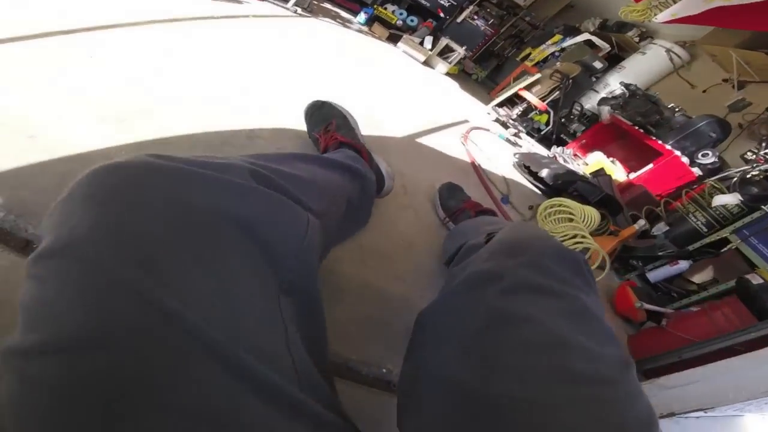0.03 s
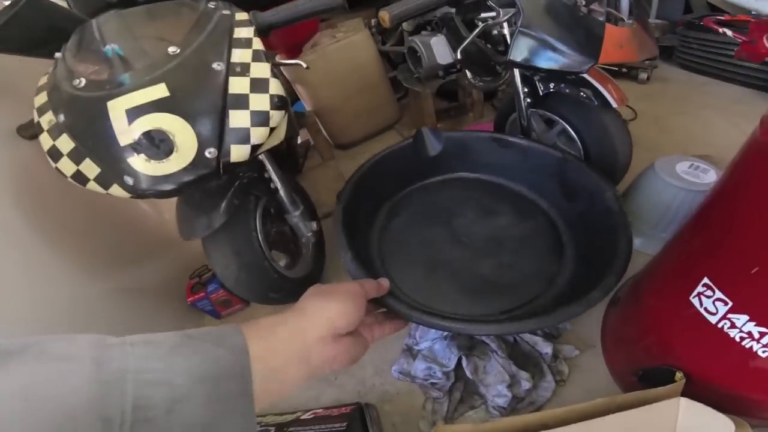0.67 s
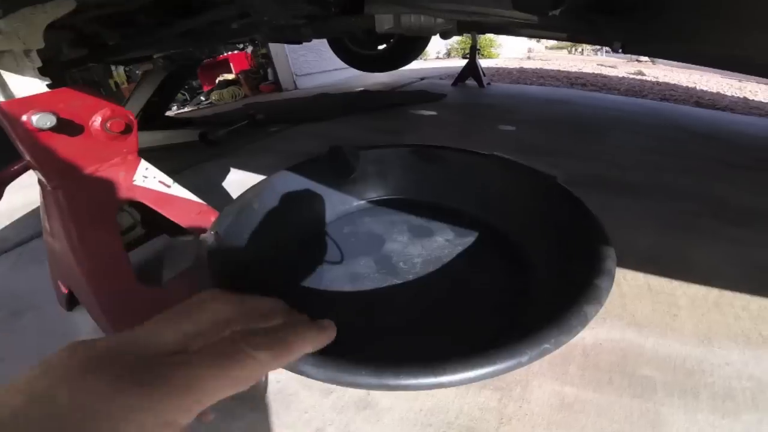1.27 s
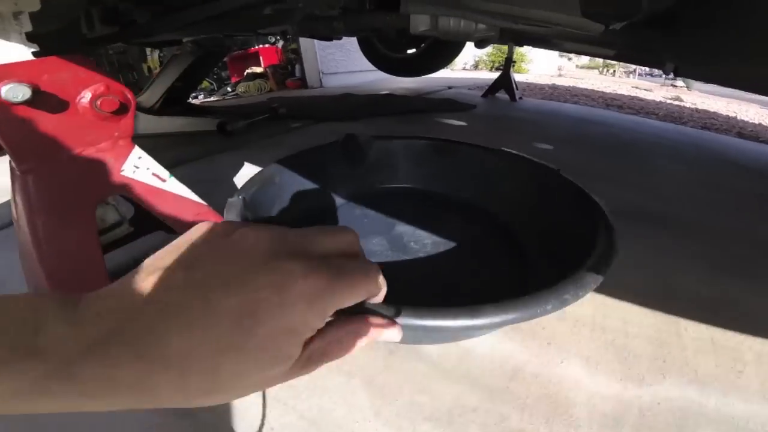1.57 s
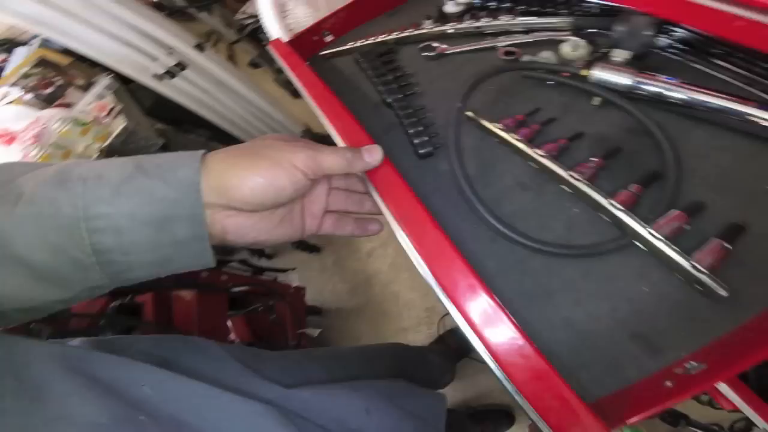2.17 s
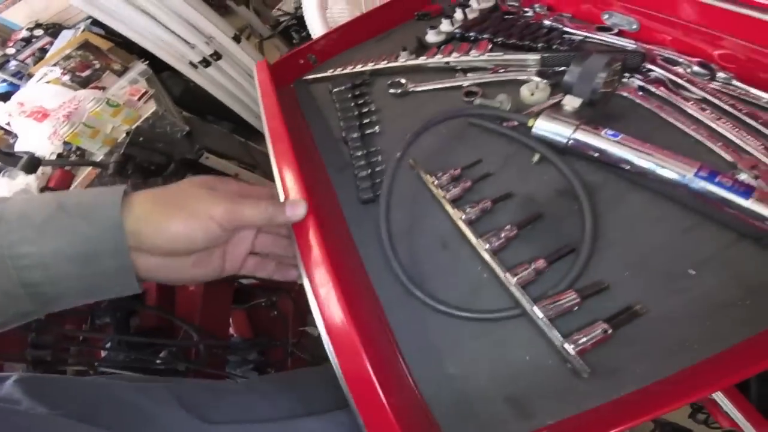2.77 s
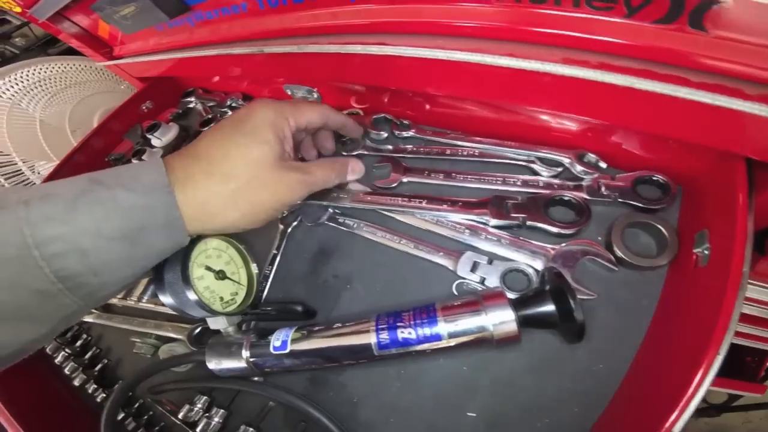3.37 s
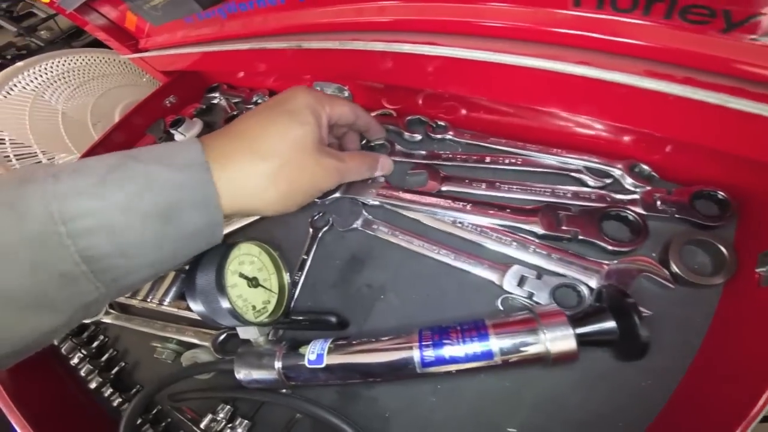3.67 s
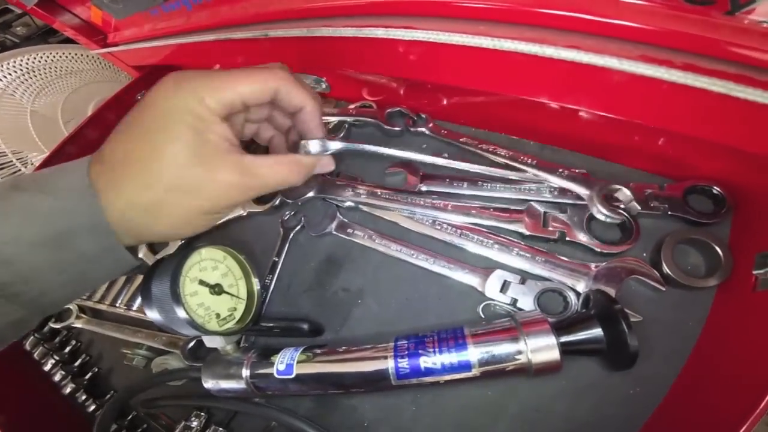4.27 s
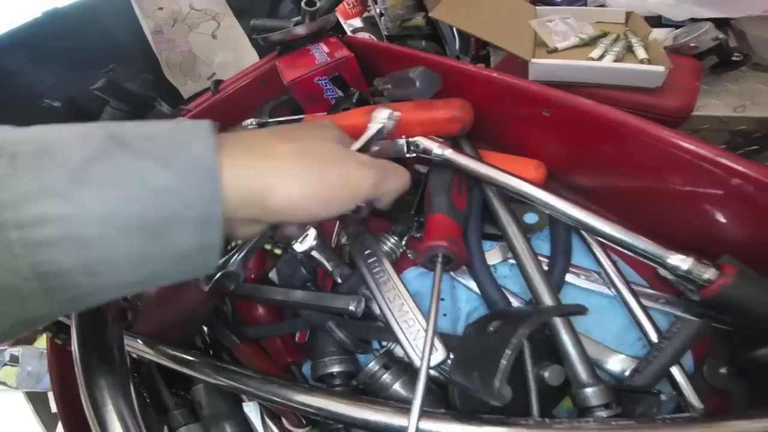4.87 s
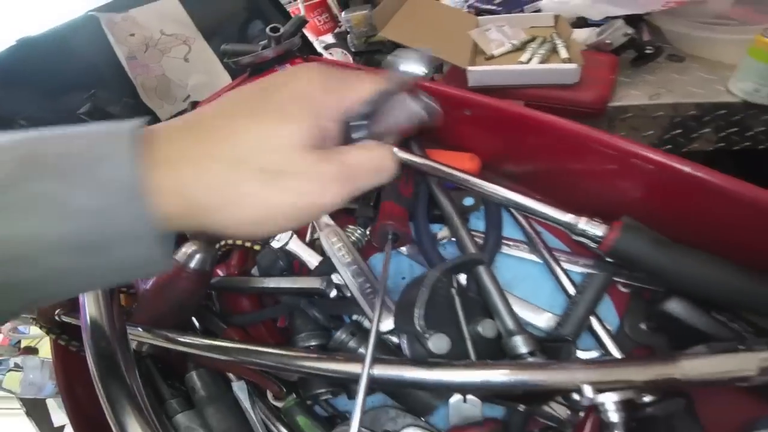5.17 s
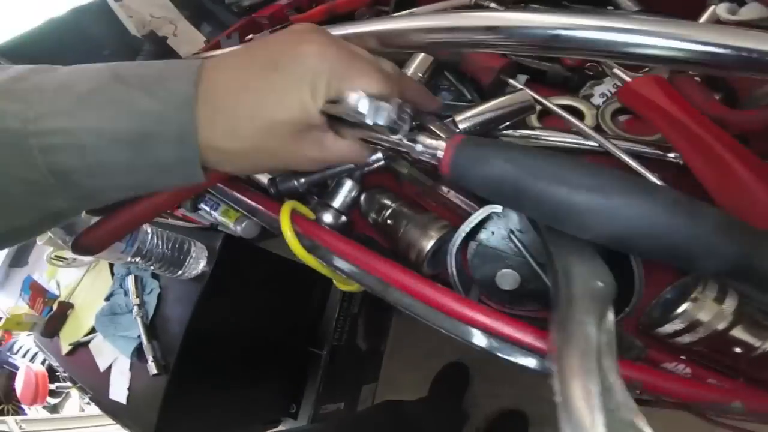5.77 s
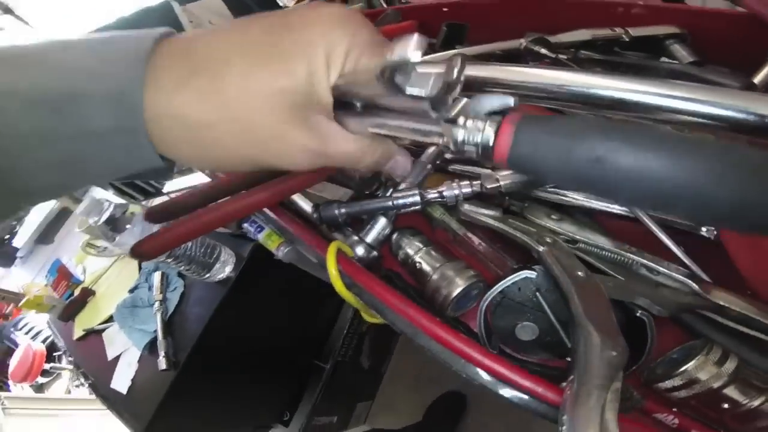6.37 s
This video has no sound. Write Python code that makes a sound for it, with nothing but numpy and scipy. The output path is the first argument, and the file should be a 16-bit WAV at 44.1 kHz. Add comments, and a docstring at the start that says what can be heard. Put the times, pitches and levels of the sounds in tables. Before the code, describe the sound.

A faint low rumble, room air and soft hiss fill a garage. The sound drops out briefly at 0.4 seconds and returns dull. A plastic drain pan gives a soft knock at 0.8 seconds, followed by faint brushes of clothing. From about 1.5 to 2 seconds the pan scrapes over gritty concrete, hollow and rasping, with low bumps. Another short dropout comes at 2.3 seconds. From 2.7 seconds a hand rummages in a lined sheet-metal drawer: muffled knocks at first, then brighter clinks, short slides and brief rings of steel wrenches and sockets. From about 4.6 seconds the tools clatter more densely in a deep bin, with hollow thumps underneath. The loudest rattle lands near 5.6 seconds, and sharp clacks continue past 6.3 seconds. Everything is close, with slight room reverb, and a final dropout ends it at 6.6 seconds.

```python
"""In a garage, a plastic drain pan scrapes over gritty concrete, then a hand rummages in a steel tool chest.
Sand catches under the pan and sounds its hollow shell. Wrenches and sockets clack, slide and ring
against each other and knock on the lined sheet-metal drawer, later on a deep bin.
Underneath lies a bed of low rumble, room air and soft hiss. Twice the sound drops out and comes
back dull; a third dropout ends it."""
import sys
import numpy as np
from scipy import signal
from scipy.fft import rfft, irfft, next_fast_len
from scipy.io import wavfile
from scipy.ndimage import uniform_filter1d

SR = 44100
rng = np.random.default_rng(int(sys.argv[2]) if len(sys.argv) > 2 else 0)


def generate_wav(sig):
    """Save sig (samples, or channels by samples) to the path in sys.argv[1] as 16-bit PCM at SR."""
    pcm = np.round(np.clip(np.atleast_2d(sig).T, -1, 1) * 32767).astype(np.int16)
    wavfile.write(sys.argv[1], SR, pcm)


N = 292672
TIME = np.arange(N) / SR

# fader moves of the bed: time_s, air_db, hiss_db, rumble_db
BED_LEVELS = [(0, -57.5, -67, -48), (1.2, -60, -64, -57.5), (2.26, -60.5, -65.5, -57),
              (3.45, -58, -64, -52.5), (4.55, -61.5, -66.5, -53), (5.1, -71, -71.5, -58),
              (5.7, -59, -72.5, -55.5), (6.1, -49.5, -67, -53.5), (6.6, -66, -68, -53.5)]
# EQ curves of the bed's three layers: freq_hz, gain_db
RUMBLE_EQ = [(10, -9), (25, 3.5), (45, -3.5), (62, -1.5), (85, 1), (120, -4.5), (160, -14), (260, -17.5),
             (500, -52)]
AIR_EQ = [(94, -25.5), (160, 1.5), (263, -8), (318, -8), (545, -11), (934, -11.5), (1040, -15), (1640, -16),
          (4000, -24.5), (5200, -48.5), (8800, -120)]
HISS_EQ = [(2000, -10), (3200, -13.5), (4500, -4.5), (5800, -4), (6600, 6), (7400, -3), (9000, -4.5),
           (10400, -13), (12700, -9), (14200, -33.5)]
# reverb time of the garage: freq_hz, t60_s
GARAGE_DECAY = [(200, 0.65), (1500, 0.16), (5000, 0.13), (12000, 0.2)]
# dropouts: start_s, end_s
DROPOUTS = [(.395, .53), (2.257, 2.399), (6.595, 6.7)]
# muffling just as the sound returns: freq_hz, gain_db
MUFFLE_EQ = [(100, -5), (800, -12.5), (2000, -11.5), (4500, -22.5), (7000, -35), (13000, -66)]

# pushes on the pan, a light shift and the long scrape:
# grip_s, crest_s, release_s, level_db, grip_db_per_s, release_db_per_s2
PAN_STROKES = [(0.78, 0.783, 0.762, -52, 171, 2500), (1.482, 1.755, 1.886, -24.5, 803, 718)]
# EQ curves of the pan's hollow body and of the grit: freq_hz, gain_db
PAN_EQ = [(150, -57), (250, -11.5), (327, -8), (468, -14), (507, -11.5), (577, -8.5), (725, -4),
          (1060, 0.5), (1220, -3), (1460, 4.5), (1620, -1), (2020, -1), (2280, -12.5), (2540, -15.5),
          (2700, -40.5), (3510, -47.5), (5940, -120)]
GRIT_EQ = [(1410, -33.5), (2400, -5.5), (2550, -4), (2780, -3.5), (3370, -3), (3680, -6.5), (4460, -7.5),
           (5530, -9), (6450, -5.5), (6950, -12.5), (7530, -16.5), (8930, -23), (10600, -33), (13000, -50),
           (14000, -48.5)]
# narrow resonances of the plastic shell: centre_hz, width_hz, strength_db
SHELL_MODES = [(844, 19, -6.5), (1060, 73, -5), (1124, 24, -0.5), (1460, 5.1, -5.5), (1453, 20, -5.5),
               (1684, 8.9, 2), (1860, 28, -3.5), (2110, 17, -5), (2060, 42, 6), (2510, 13, 3.5),
               (2530, 12, 8), (3300, 120, -16.5)]
# soft low bumps of pan and chest: start_s, level_db, pitch_hz
LOW_BUMPS = [(1.489, -26.5, 163.5), (1.615, -29.5, 169.6), (1.713, -26, 195), (1.922, -32, 284),
             (1.947, -28, 159.5), (2.667, -29.5, 163), (3.363, -32.5, 624), (4.869, -29, 220),
             (5.773, -32.5, 133), (6.017, -25.5, 132), (6.356, -29, 202)]
# brushes of clothing: start_s, length_s, level_db
CLOTH_BRUSHES = [(0.162, 0.054, -62.5), (0.277, 0.068, -67), (1.044, 0.16, -47.5), (1.266, 0.059, -47.5)]
# EQ curves of cloth, a steel clack and the thump under it: freq_hz, gain_db
CLOTH_EQ = [(600, -33), (2000, 4), (4500, 9), (6600, 12.5), (7600, 1), (12000, -40)]
STEEL_EQ = [(1200, -43), (1900, -5.5), (2400, 1), (3400, 4), (4600, 2.5), (6200, 4.5), (7500, -3.5),
            (9000, -8), (10000, -20), (12300, -29.5), (15000, -53)]
THUMP_EQ = [(50, -20.5), (130, -0.5), (300, 6), (580, 4), (800, -3.5), (1500, -84)]

# panel resonances of the shallow wrench drawer and the deep bin: centre_hz, width_hz, strength_db
DRAWER_MODES = [(310, 60, 0.5), (638, 130, -11), (738, 110, 2.5), (946, 140, -3), (1156, 36, 0.5),
                (1440, 360, 2.5), (1580, 84, -10.5), (1916, 43, -0.5), (2120, 360, -9.5)]
BIN_MODES = [(306.2, 14.3, 10.5), (582, 116, 3.5), (675, 104, 2.5), (948, 120, 3.5), (1132, 390, -1),
             (1246, 65, 9.5), (1542, 230, -0.5), (1910, 390, 0), (2300, 210, -1)]
# free modes of each tool and chest part, by name: pitch_hz, strength_db, t60_s
TOOL_MODES = { "spanner": [(1715, -23, .16), (2252, -14, .11), (2921, -23, .4), (4633, 0, .052),
              (4638, -25, .8), (4953, -16, .08), (6310, -13, .02), (7705, -4, .07), (8860, -17, .24),
              (9870, -24, .06), (11270, -24, .09), (11700, -20, .055), (12195, -30, .28)],
              "ratchet wrench": [(3530, -19, .13), (4700, 0, .04), (5577, -7, .09), (5680, -6, .04),
              (7440, -21, .45), (7712, -12, .09), (8870, -9, .1), (9265, -9, .08), (10275, -22, .12),
              (10486, -26, .5), (11510, -20, .12), (12200, -27, .15), (13129, -22, .12)],
              "chest wall": [(760, 10, 1), (845, 0.5, 1), (2290, -18, .25)], "spanner jaw": [(2921, 0, .8)],
              "socket": [(5200, -5, 0.097), (9700, -2, .24)], "driver bit": [(6850, 5, 0.031),
              (6700, -34, 0.94), (10800, -15.5, 0.046)], "drawer": [(301.5, -4.5, 0.3), (796, 13.5, 0.014),
              (1056, -29, 0.088), (1534, 13, 0.025), (1610, -2, 0.12), (1680, -11, 0.21),
              (4460, -26.5, 0.052), (4700, 17, 0.037)]}
# blows that leave steel ringing: start_s, tool, level_db, favoured_hz, undamped_s
RINGING_BLOWS = [(2.4, "chest wall", -54, 612, .18), (3.021, "chest wall", -64.5, 1000, 0.094),
                 (3.545, "chest wall", -54, 950, 0.12), (3.269, "drawer", -46, 4700, .1),
                 (3.3627, "drawer", -16.5, 750, .18), (3.504, "drawer", -28, 1490, .1),
                 (3.541, "drawer", -12.5, 1560, .25), (3.863, "drawer", -29, 1460, 0.12),
                 (4.176, "ratchet wrench", -34, 7040, .2), (4.2843, "ratchet wrench", -11.5, 5240, 0.038),
                 (4.3204, "ratchet wrench", -20.5, 5600, 0.0089),
                 (4.337, "ratchet wrench", -37, 7440, 0.12), (4.441, "ratchet wrench", -33, 5600, 0.037),
                 (4.6226, "socket", -36, 5254, .1), (4.787, "driver bit", -15.5, 6900, .32),
                 (4.905, "spanner", -24.5, 6360, 0.031), (5.184, "spanner", -12.5, 4830, 0.21),
                 (5.209, "spanner", -20.5, 7700, 0.12), (5.222, "spanner", -18.5, 7700, 0.016),
                 (5.3279, "spanner", -19.5, 4630, 0.16), (5.3318, "spanner jaw", -32.5, 2921, 0.098),
                 (5.4123, "spanner", -22, 4635, .19), (5.6138, "spanner", -11.5, 4630, 0.0095)]
# tools dragged over each other: start_s, length_s, rasp_db, pitch_hz, singing_tool, song_db
TOOL_SLIDES = [(3.433, 0.06, -58.5, 5260, "drawer", -66), (4.29, 0.062, -35, 5700, "ratchet wrench", -43.5),
               (4.438, 0.035, -34, 6120, "ratchet wrench", -31.5),
               (5.193, 0.056, -36, 3700, "spanner", -30), (5.372, 0.044, -46.5, 4800, "spanner", -34.5),
               (5.405, 0.077, -44, 7880, "spanner", -28), (5.464, 0.076, -47.5, 4760, "spanner", -43),
               (5.779, 0.069, -47, 6130, "ratchet wrench", -68),
               (6.032, 0.14, -56.5, 5800, "ratchet wrench", -66),
               (6.145, 0.045, -31.5, 5950, "ratchet wrench", -37.5),
               (6.349, 0.016, -24.5, 8440, "spanner", -24.5), (6.374, 0.14, -57.5, 4040, "drawer", -70)]
# single hits: start_s, clack_db, pitch_hz, t60_s, panel_db, thump_db
SINGLE_HITS = [(.655, -68, 2350, .069, -58, -55), (.812, -61, 2860, 0.023, -32, -22.5),
               (1.321, -51, 2090, 0.038, -43, -57), (1.386, -55.5, 2200, 0.076, -45, -50.5),
               (1.441, -48, 2600, 0.15, -49.5, -51), (2.794, -32.5, 2350, 0.072, -33, -50),
               (3.021, -54, 2150, 0.066, -50, -75), (3.227, -49.5, 6440, 0.036, -56, -38.5),
               (3.268, -47, 3400, .084, -42, -49), (3.3615, -28, 2500, 0.099, -23, -31),
               (3.49, -55, 1880, 0.12, -50, -35), (3.503, -38.5, 1830, .12, -33.5, -38),
               (3.54, -24.5, 4660, 0.081, -23, -44), (3.83, -40.5, 4780, .065, -38.5, -35.5),
               (3.857, -39.5, 4300, 0.11, -32, -47), (3.863, -34, 6500, 0.036, -26.5, -41.5),
               (3.899, -31.5, 6000, 0.071, -35, -39), (4.175, -28, 5540, 0.084, -39.5, -33),
               (4.257, -45.5, 7280, 0.21, -47, -54), (4.284, -22.5, 5910, 0.097, -34, -29.5),
               (4.378, -56, 7560, 0.054, -33.5, -49.5), (4.4764, -33.5, 5430, .11, -26.5, -40),
               (4.5188, -30, 5230, 0.048, -35, -36.5), (4.6226, -44, 5250, .075, -46.5, -39),
               (4.653, -23.5, 5800, 0.048, -21.5, -18), (4.772, -33, 6300, 0.11, -28, -26.5),
               (4.8511, -35.5, 6440, 0.11, -32, -31.5), (4.866, -40.5, 2010, .09, -34, -30.5),
               (4.905, -30.5, 4790, 0.039, -45, -35), (5.1848, -27.5, 2345, 0.14, -49, -70),
               (5.3275, -8.5, 7960, 0.0069, -34, -51), (5.7201, -20.5, 4800, 0.023, -36, -47.5),
               (5.759, -27.5, 5700, 0.023, -58, -31), (5.8767, -27, 5430, 0.04, -43.5, -34),
               (5.9177, -31.5, 5990, 0.072, -44, -36.5), (6.1526, -27.5, 6200, 0.1, -38, -41.5),
               (6.283, -41, 2300, 0.051, -44.5, -40), (6.3535, -17.5, 6280, 0.098, -34, -30.5),
               (6.5602, -27, 4800, 0.015, -39, -63.5)]
# tools bouncing to rest, with the levels of the first hit:
# start_s, hit_count, spacing_s, step_db, clack_db, pitch_hz, t60_s, panel_db, thump_db
TOOL_RATTLES = [(2.658, 3, 0.036, -2, -37, 2100, .11, -39, -43),
                (4.44, 2, 0.0083, -1, -31, 5560, .1, -28, -25.5),
                (4.6782, 2, 0.023, -3.5, -27, 2060, 0.043, -38.5, -33),
                (4.7293, 2, 0.023, -4.5, -37, 4900, 0.076, -33, -43),
                (4.782, 2, 0.0063, 1, -20, 6750, 0.035, -29.5, -53.5),
                (5.592, 2, 0.0048, -6.5, -10.5, 4650, 0.017, -20.5, -26),
                (5.6066, 4, 0.0045, -3, -10, 4970, 0.017, -14, -13),
                (5.642, 3, 0.0068, 0.5, -28.5, 2560, 0.03, -73, -45.5),
                (5.77, 4, .011, 0, -22, 6100, 0.044, -36.5, -38),
                (6.0148, 2, .008, -8.5, -21.5, 5530, 0.034, -27, -25),
                (6.1731, 2, .0214, -8, -20.5, 5440, 0.059, -29, -35.5),
                (6.231, 2, 0.022, -12.5, -20, 4920, 0.032, -41, -53),
                (6.323, 2, 0.0031, -0.5, -11, 5340, 0.029, -39, -60)]
# faint nudges as the hand feels about: start_s, end_s, clack_db, panel_and_thump_db
HAND_NUDGES = [(4.057, 4.148, -57.5, -59), (4.198, 4.436, -45, -46), (6.05, 6.149, -45.5, -45)]


def amp(db):
    return 10 ** (np.asarray(db) / 20)


def unit(x):
    return x / np.sqrt(np.mean(x ** 2) + 1e-20)


def curve_at(points, hz):
    """Reads a curve along a log frequency axis."""
    freqs, values = np.transpose(points)
    return np.interp(np.log(hz + 1), np.log(freqs + 1), values)


def add(mix, start_s, sound):
    part = mix[round(start_s * SR):][:len(sound)]
    part += sound[:len(part)]


def peak(hz, centre_hz, width_hz):
    """Gain of one resonance, 1 at its centre."""
    return 1 / np.sqrt(1 + (2 * (hz - centre_hz) / width_hz) ** 2)


def resonances(modes, hz):
    """Summed gain of a bank of resonances."""
    return sum(amp(db) * peak(hz, centre_hz, width_hz) ** 2 for centre_hz, width_hz, db in modes)


def shaped(x, gain):
    """Filters x by gain(hz), to rms 1."""
    size = next_fast_len(len(x))
    hz = np.fft.rfftfreq(size, 1 / SR)
    return unit(irfft(rfft(x, size) * gain(hz), size)[:len(x)])


def coloured(x, eq, modes=()):
    """Runs x through an EQ curve with any resonances on top, to rms 1."""
    return shaped(x, lambda hz: amp(curve_at(eq, hz)) * (1 + resonances(modes, hz)))


def dying(x, t, t60, rise_s):
    """Gives x an attack and a decay, with the energy of a steady unit sound so faded."""
    fade = amp(-60 * t / t60) * (1 - np.exp(-t / rise_s))
    return unit(x * fade) * np.sqrt(np.mean(fade ** 2))


def grains(size, per_s, spread_db):
    """Tiny slips at random moments, a few much larger than the rest, over a faint noise floor."""
    sizes = rng.standard_normal(size) * amp(spread_db * np.minimum(rng.exponential(1, size), 4))
    slipping = rng.random(size) < per_s / SR
    return sizes * (slipping + 0.09)


def waver(size, samples, depth_db):
    """A random gain flutter, smoothed over the given samples."""
    return amp(depth_db * unit(uniform_filter1d(rng.standard_normal(size), samples)))


def wandering(x, depth_db):
    """As the touching edge shifts, patches of the spectrum swell for a few hundredths of a second."""
    spectrum = signal.stft(x, nperseg=256)[2]
    patches = uniform_filter1d(rng.standard_normal(spectrum.shape), size=4, axis=0)
    patches = unit(uniform_filter1d(patches, size=6, axis=1))
    return unit(signal.istft(spectrum * amp(depth_db * patches), nperseg=256)[1][:N])


def background(swell_db=-36, swell_at_s=1.737, swell_width_s=0.32):
    """The bed: room air, hiss, and a handling rumble that swells around the long scrape."""
    times, *faders = np.transpose(BED_LEVELS)
    air, hiss, rumble = [amp(np.interp(TIME, times, db)) for db in faders]
    swell = amp(swell_db) * np.exp(-((TIME - swell_at_s) / swell_width_s) ** 2)
    layers = [(rumble + swell, RUMBLE_EQ), (air, AIR_EQ), (hiss, HISS_EQ)]
    return sum(gain * coloured(rng.standard_normal(N), eq) for gain, eq in layers)


def garage(x, echoes_per_s=3000, predelay_s=0.004):
    """Sparse reflections from a cluttered room, the treble dying before the bass."""
    size = SR // 2
    taps = rng.standard_normal(size) * (rng.random(size) < echoes_per_s / SR)
    taps *= np.arange(size) > predelay_s * SR
    hz, t, spectrum = signal.stft(taps, SR, nperseg=256)
    decay = amp(-60 * t / curve_at(GARAGE_DECAY, hz)[:, None])
    tail = signal.istft(spectrum * decay, SR, nperseg=256)[1]
    return signal.fftconvolve(x, tail / np.linalg.norm(tail))[:N]


def dropouts(x, ease_s=0.51, muffled_s=0.795, pop_db=-39.5):
    """The sound cuts out, then comes back with a soft low pop; the treble returns slowly."""
    hz, times, spectrum = signal.stft(x, SR, nperseg=256)
    depth = sum(np.exp(-abs(times - end) / ease_s) * (times > start) * (times < end + muffled_s)
                for start, end in DROPOUTS)
    muffle = amp(curve_at(MUFFLE_EQ, hz)[:, None] * depth)
    out = signal.istft(spectrum * muffle, SR, nperseg=256)[1][:N]
    gate = 1.0 - sum((TIME > start) & (TIME < end) for start, end in DROPOUTS)
    out *= uniform_filter1d(gate, size=128)
    t = np.arange(8192) / SR
    for _, end in DROPOUTS:
        pop = coloured(rng.standard_normal(len(t)), THUMP_EQ)
        add(out, end, amp(pop_db) * dying(pop, t, t60=0.012, rise_s=0.0016))
    return out


def clothes():
    """Cloth brushes by in smooth swells of bright noise."""
    out = np.zeros(N)
    for start_s, length_s, db in CLOTH_BRUSHES:
        size = int(length_s * SR)
        swish = coloured(rng.standard_normal(N), CLOTH_EQ)[:size]
        add(out, start_s, amp(db) * swish * signal.windows.hann(size))
    return out


def bumps():
    """A heavy part gives way for a few slow cycles."""
    out, t = np.zeros(N), np.arange(8192) / SR
    for start_s, db, hz in LOW_BUMPS:
        add(out, start_s, amp(db) * dying(np.sin(2 * np.pi * hz * t), t, t60=0.062, rise_s=0.0014))
    return out


def stroke_db(grip_s, crest_s, release_s, db, grip_db_per_s, release_db_per_s2, arch_db_per_s2=94.5):
    """The push on the pan: a quick grip, a shallow arch, a release that gathers speed."""
    grip = grip_db_per_s * np.maximum(grip_s - TIME, 0)
    arch = arch_db_per_s2 * (TIME - crest_s) ** 2
    release = release_db_per_s2 * np.maximum(TIME - release_s, 0) ** 2
    return db - (grip + arch + release)


def pan_scrape(grit_db=-0.75, grit_lag_s=0.012, grit_db_per_push_db=1.1):
    """Sand grains catch under the pan in uneven jerks and sound its hollow shell."""
    push_db = np.max([stroke_db(*stroke) for stroke in PAN_STROKES], axis=0).clip(min=-150)
    catches = wandering(grains(N, per_s=8000, spread_db=1.8), depth_db=2.4)
    catches *= waver(N, samples=200, depth_db=0.6)
    shell = amp(push_db) * coloured(catches, PAN_EQ, SHELL_MODES)
    bite_db = np.interp(TIME - grit_lag_s, TIME, push_db)  # the grit bites just after the shell answers
    grit = amp(grit_db + grit_db_per_push_db * bite_db) * coloured(catches, GRIT_EQ)
    return shell + grit


def damped_steel(x, pitch_hz, width_hz=650, strength_db=10):
    """Tools lying on each other are heavily damped: a broad colour with one blunt resonance."""
    return coloured(x, STEEL_EQ, [(pitch_hz, width_hz, strength_db)])


def ringing(tool, favoured_hz, t, favour_db=14, favour_width_hz=450, rise_s=0.00045):
    """A tool's answer to one blow; where the blow lands decides which modes take most of it."""
    hz, mode_db, t60 = np.transpose(TOOL_MODES[tool])
    chance_db = rng.uniform(-3, 3, len(hz))
    share = amp(mode_db + chance_db + favour_db * peak(hz, favoured_hz, favour_width_hz))
    weights = rng.choice([-1, 1], len(hz)) * share / np.linalg.norm(share)
    modes = np.sin(2 * np.pi * hz[:, None] * t) * amp(-60 * t / t60[:, None])
    attack = 1 - np.exp(-t / rise_s)
    return np.sqrt(2) * (weights @ modes) * attack


def tool_slides(song_decay_s=0.01):
    """Steel sticks and slips over steel, and the slips keep the tool singing."""
    out, t = np.zeros(N), np.arange(8192) / SR
    for start_s, length_s, rasp_db, pitch_hz, tool, song_db in TOOL_SLIDES:
        stroke = np.clip(3 * np.minimum(t / length_s, 1 - t / length_s), 0, 1)
        slips = grains(len(t), per_s=1700, spread_db=3.0)
        choked_ring = ringing(tool, pitch_hz, t) * np.exp(-t / song_decay_s)
        song = signal.fftconvolve(slips * stroke, choked_ring)[:len(t)]
        add(out, start_s, amp(rasp_db) * damped_steel(slips, pitch_hz) * stroke)
        add(out, start_s, amp(song_db) * unit(song) * np.sqrt(np.mean(stroke ** 2)))
    return out


def tool_rings(damped_t60=0.016):
    """A loose tool or chest panel rings until a finger or a neighbour damps it."""
    out, t = np.zeros(N), np.arange(SR // 2) / SR
    for start_s, tool, db, favoured_hz, undamped_s in RINGING_BLOWS:
        choke = amp(-60 * np.maximum(t - undamped_s, 0) / damped_t60)
        add(out, start_s, amp(db) * ringing(tool, favoured_hz, t) * choke)
    return out


def clack_notes(t, pitch_hz, main_db=3, count=9):
    """The notes of whichever tool in the heap was hit: one main pitch among random partials."""
    hz = rng.uniform(2000, 12500, count)
    weights = amp(curve_at(STEEL_EQ, hz)) * rng.choice([-1, 1], count)
    partials = unit(weights @ np.sin(2 * np.pi * hz[:, None] * t))
    main = unit(np.sin(2 * np.pi * pitch_hz * t))
    return unit(partials + amp(main_db) * main)


def hit_cues(nudges_per_s=22, nudge_hz=7200, nudge_t60=0.18):
    """The cue list of clacks: single hits, each bounce of a rattle, and chance nudges."""
    cues = list(SINGLE_HITS)
    for start_s, count, spacing_s, step_db, clack_db, pitch_hz, t60, panel_db, thump_db in TOOL_RATTLES:
        for k in range(round(count)):
            at_s, trim_db = start_s + k * spacing_s, k * step_db
            cues.append((at_s, clack_db + trim_db, pitch_hz, t60, panel_db + trim_db, thump_db + trim_db))
    for start_s, end_s, clack_db, body_db in HAND_NUDGES:
        span_s = end_s - start_s
        count = max(round(span_s * nudges_per_s), 1)
        for at_s in start_s + span_s * (np.arange(count) + rng.random(count)) / count:
            cues.append((at_s, clack_db, nudge_hz, nudge_t60, body_db, body_db))
    return cues


def tool_clacks(bin_opens_s=4.6, panel_t60_ratio=1.275, tick_db=2, tick_s=0.00077):
    """Each hit is a tick, a few short notes and a chatter of rebounds that shakes panel and chest."""
    out, t = np.zeros(N), np.arange(8192) / SR
    tick = 1 + amp(tick_db) * np.exp(-t / tick_s)
    for start_s, clack_db, pitch_hz, t60, panel_db, thump_db in hit_cues():
        t60 = max(t60, 0.008)
        rebounds = rng.standard_normal((3, len(t))) * waver(len(t), samples=70, depth_db=0.5)
        # steel on steel gives notes; a knock on the lined drawer gives almost none
        note_gain = np.clip((clack_db - panel_db + 6) / 18, 0.2, 0.9)
        clack = unit(damped_steel(rebounds[0], pitch_hz) + note_gain * clack_notes(t, pitch_hz))
        panel_modes = DRAWER_MODES if start_s < bin_opens_s else BIN_MODES
        panel = shaped(rebounds[1], lambda hz: resonances(panel_modes, hz))
        thump = coloured(rebounds[2], THUMP_EQ)
        add(out, start_s, amp(clack_db) * dying(clack * tick, t, t60, rise_s=0.00046))
        add(out, start_s, amp(panel_db) * dying(panel, t, t60 * panel_t60_ratio, rise_s=0.00072))
        add(out, start_s, amp(thump_db) * dying(thump, t, t60, rise_s=0.0036))
    return out


def scene(clack_trim_db=-1, ring_trim_db=-1, reverb_db=-20):
    """The mono mix: close action with a little garage reverb over the bed, all cut by the dropouts."""
    bed = background()
    close = pan_scrape() + bumps() + tool_slides() + clothes()
    close += amp(ring_trim_db) * tool_rings() + amp(clack_trim_db) * tool_clacks()
    return dropouts(close + amp(reverb_db) * garage(close) + bed)[None]


def record(dry, top_hz=14000, ceiling=0.66, band_limit_hz=15600):
    """The microphone dulls the highest treble and rounds the sharpest peaks; a steep low-pass follows."""
    dulled = signal.sosfilt(signal.butter(4, top_hz, fs=SR, output="sos"), dry)
    rounded = ceiling * np.tanh(dulled / ceiling)
    low_pass = signal.firwin(511, band_limit_hz, window=("kaiser", 9), fs=SR)
    return signal.oaconvolve(rounded, low_pass[None], "same")


dry = scene()
out = record(dry)
generate_wav(out)
```